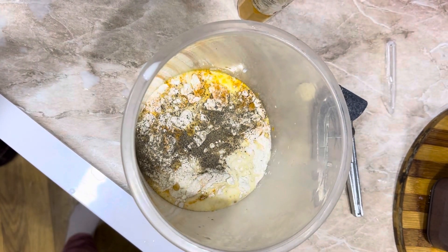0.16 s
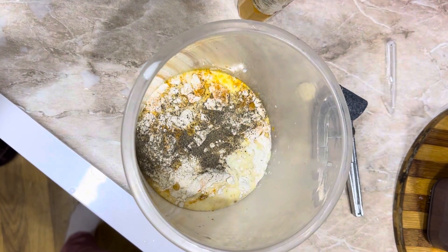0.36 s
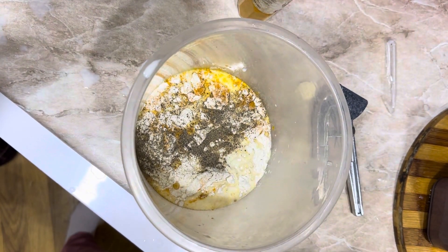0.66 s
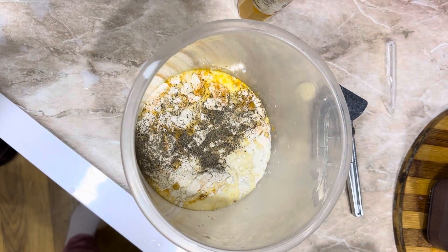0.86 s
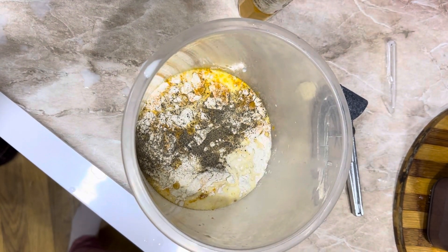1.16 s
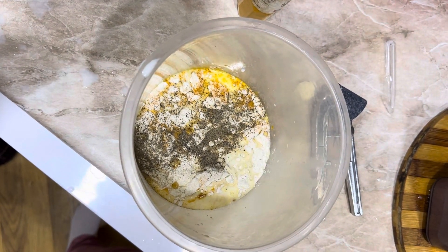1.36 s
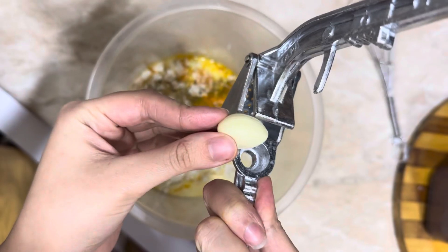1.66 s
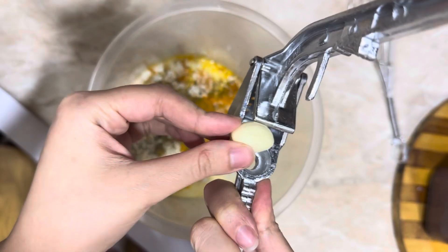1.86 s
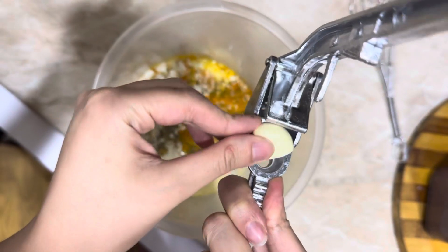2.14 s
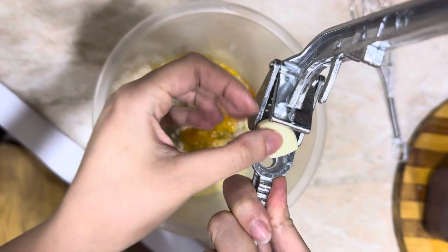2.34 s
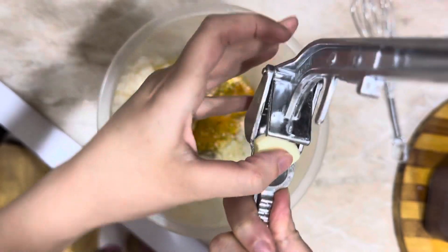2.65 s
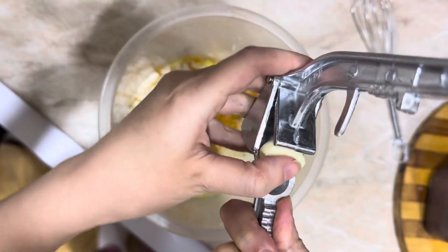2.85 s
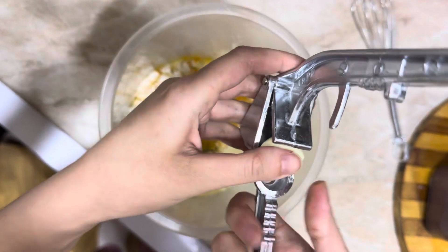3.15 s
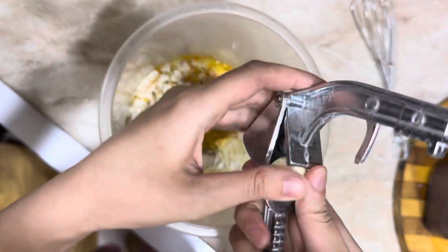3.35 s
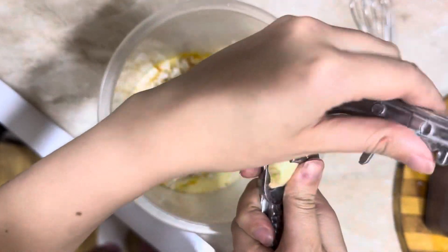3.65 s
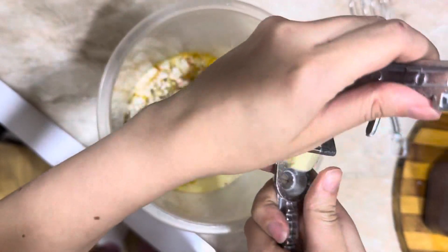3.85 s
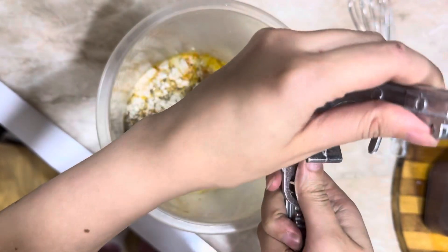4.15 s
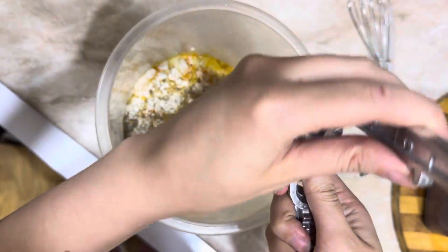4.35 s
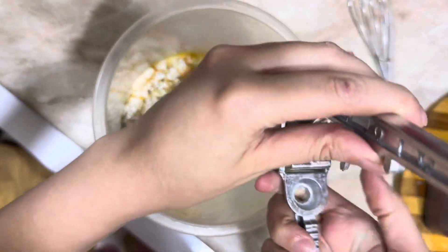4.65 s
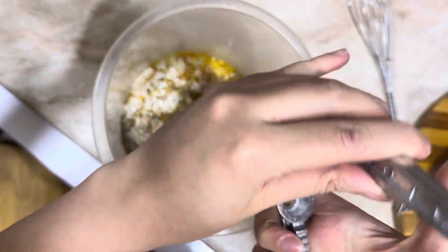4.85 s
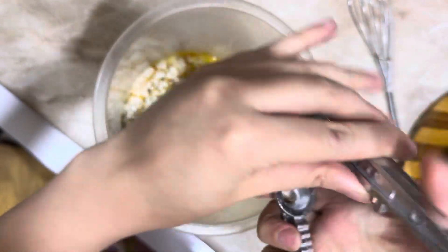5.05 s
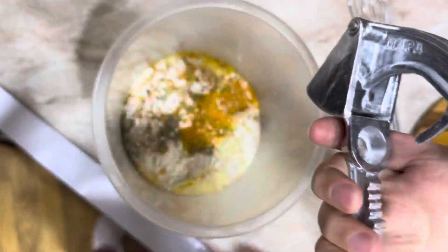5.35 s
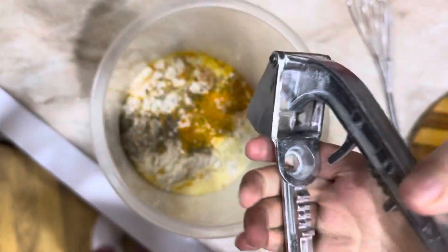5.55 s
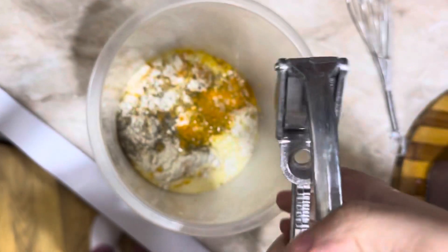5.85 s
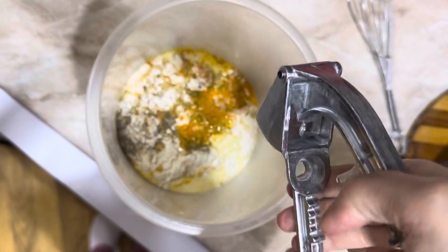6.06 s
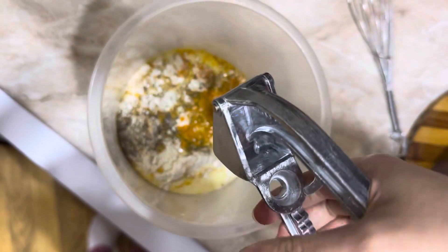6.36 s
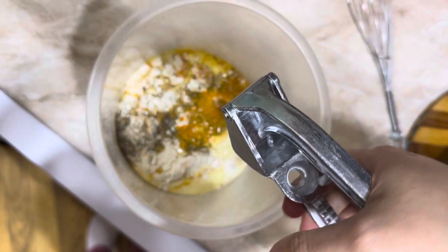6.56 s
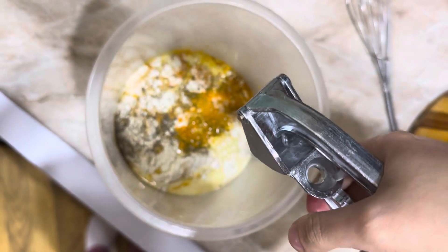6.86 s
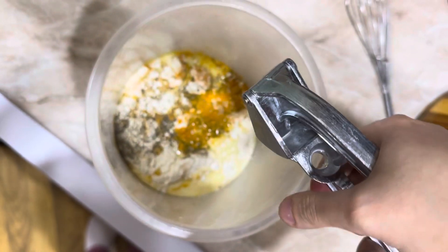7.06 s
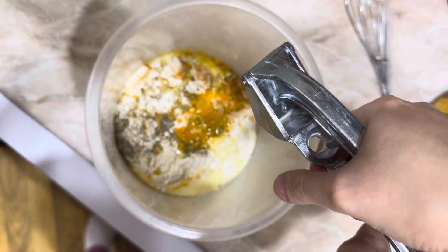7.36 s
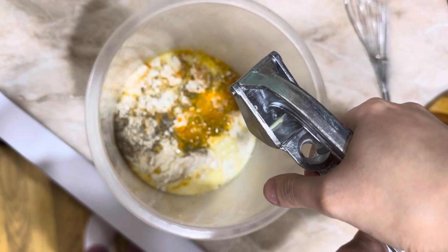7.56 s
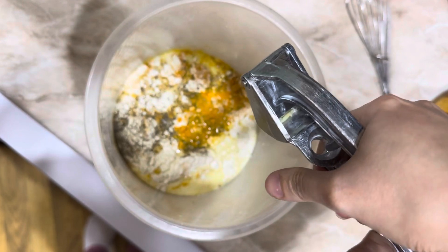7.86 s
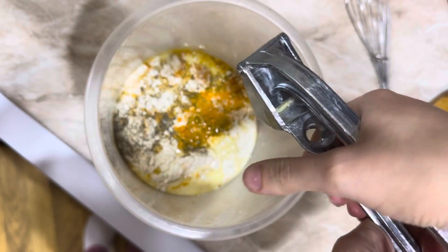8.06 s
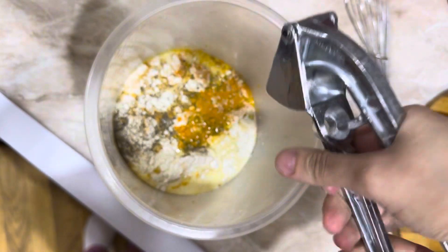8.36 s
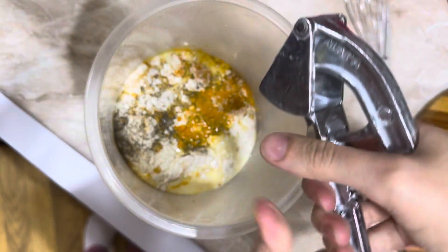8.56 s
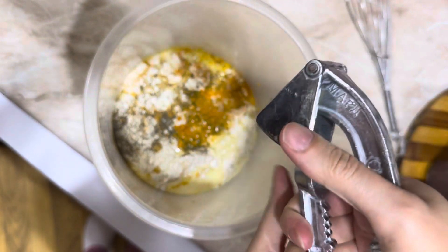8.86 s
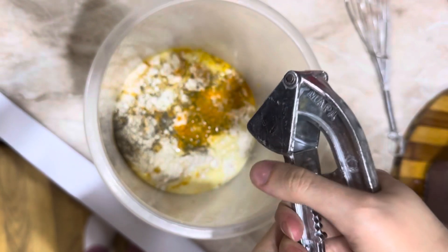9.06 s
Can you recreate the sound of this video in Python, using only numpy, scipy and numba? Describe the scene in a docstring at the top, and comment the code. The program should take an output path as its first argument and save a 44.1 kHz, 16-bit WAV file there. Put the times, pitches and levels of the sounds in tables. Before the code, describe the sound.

A metal garlic press clicks and snaps shut, then a clove cracks and juice hisses and spits in a quiet kitchen.

```python
"""A quiet kitchen, one microphone close to a mixing bowl; an appliance hums throughout.
First, a little way off, things knock and slide on the counter. From 2 s, close by, fingers load a metal
garlic press: its hinge scrapes, its plunger squeaks, and near 4.9 s it snaps shut. At 6.2 s the clove
cracks under the squeeze; juice and air seep and spit through the holes, gush at 7.3 s and leave a
fizzing foam. Last come a faint gurgle and the fingers shifting on the metal."""
import sys
import numpy as np
from scipy import signal
from scipy.fft import rfft, irfft
from scipy.io import wavfile
from scipy.ndimage import uniform_filter1d
from numba import njit

SR = 44100
rng = np.random.default_rng(int(sys.argv[2]) if len(sys.argv) > 2 else 0)


def master_out(mix):
    """Clip the mix to full scale and print it as 16-bit PCM to the path in sys.argv[1]."""
    frames = np.transpose(np.atleast_2d(mix))
    ceiling = np.clip(frames, -1, 1)
    pcm = np.round(ceiling * 32767).astype(np.int16)
    wavfile.write(sys.argv[1], SR, pcm)


N = 406161
TIME = np.arange(N) / SR


def amp(db):
    """Decibels to gain."""
    return 10 ** (np.asarray(db) / 20)


def unit(x):
    """Scales to rms 1."""
    return x / np.sqrt(np.mean(x ** 2) + 1e-20)


def read(points, hz):
    """Reads a table on a log-frequency axis."""
    f, value = np.transpose(points)
    return np.interp(np.log(hz + 1), np.log(f + 1), value)


def add(mix, s, sound):
    """Mixes a sound in at time s."""
    start = round(s * SR)
    sound = sound[max(-start, 0):]
    part = mix[max(start, 0):][:len(sound)]
    part += sound[:len(part)]


def colour(x, spectrum, hz=1000, bump_db=0, tilt_db=0):
    """Causal filter: a spectrum with a bump at hz, tilted by tilt_db per octave for two each side."""
    f = abs(np.fft.fftfreq(len(x), 1 / SR))
    octaves = np.log2((f + 1) / hz)
    db = read(spectrum, f) + bump_db * np.exp(-(octaves / .24) ** 2) + tilt_db * np.clip(octaves, -2, 2)
    minimum_phase = np.exp(np.conj(signal.hilbert(np.log(amp(db)))))
    return np.fft.ifft(np.fft.fft(x) * minimum_phase).real


@njit
def smooth(x, memory):
    """One-pole low-pass whose memory may change."""
    y = x.copy()
    for i in range(1, len(x)):
        y[i] = memory[i] * y[i - 1] + (1 - memory[i]) * x[i]
    return y


def resonate(x, hz, width):
    """A steep resonance whose pitch and width in Hz may glide; noise keeps its level through it."""
    carrier = np.exp(2j * np.pi * np.cumsum(hz * np.ones(N)) / SR)
    memory = np.exp(-np.pi * abs(width) * np.ones(N) / SR)
    band = carrier * smooth(smooth(x / carrier, memory), memory)
    return unit(band.real / np.sqrt(1 - memory))


def drift(rate_hz):
    """A random wander of rms 1, mostly slower than rate_hz."""
    rolloff = np.exp(-np.fft.rfftfreq(N, 1 / SR) / rate_hz)
    return unit(irfft(rfft(rng.standard_normal(N)) * rolloff, N))


def grains(per_s, spread_db):
    """Random clicks of uneven size."""
    size = amp(spread_db * np.minimum(rng.exponential(1, N), 4))
    return unit(size * rng.choice([-1, 1], N) * (rng.random(N) < per_s / SR))


def swells(rows, edge=2):
    """Envelope of strokes (middle t/s, length/s, level/dB); a higher edge makes them more abrupt."""
    return sum(amp(db) * np.exp(-abs(2 * (TIME - s) / length) ** edge) for s, length, db in rows)


def held(start, end, attack_s, fade_db_per_s):
    """Envelope that rises, holds and dies away."""
    return np.clip((TIME - start) / attack_s, 0, 1) * amp(-fade_db_per_s * np.clip(TIME - end, 0, 2))


def ring(modes):
    """A sum of dying sines."""
    t = TIME[:SR // 2]
    return sum(amp(db - 60 * t / t60) * np.sin(2 * np.pi * hz * t) for hz, db, t60 in modes)


def burst(rattle_s):
    """A spray of tiny contacts, dying in a few ms, even in spectrum."""
    t = TIME[:SR // 10]
    spectrum = rfft(rng.standard_normal(len(t)) * np.exp(-t / rattle_s))
    spectrum /= np.sqrt(uniform_filter1d(abs(spectrum) ** 2, size=70) + 1e-12)
    delay = np.exp(-2j * np.pi * np.fft.rfftfreq(len(t), 1 / SR) * .001)
    return irfft(spectrum * delay, len(t))


def blows(rows, spectrum, rattle_s, modes=(), ring_db=0):
    """Each blow is a coloured burst that may set a body ringing; 26 dB harder rattles half as long."""
    out = np.zeros(N)
    mean_db = np.mean(rows, axis=0)[1]
    for s, db, hz, bump_db, tilt_db in rows:
        spray = burst(rattle_s * 2 ** ((mean_db - db) / 26))
        hit = colour(spray, spectrum, hz, bump_db, tilt_db)[:SR // 20]
        peak = 2 * np.sqrt(uniform_filter1d(hit ** 2, size=44).max())
        add(out, s - .0005, amp(db) * hit / peak)
        if len(modes):
            add(out, s + .001 + rng.random() / 1000, amp(db + ring_db) * ring(modes))
    return out


# room tone: f/Hz, gain/dB
AIR_COLOUR = [(15, -58.5), (25, -36), (102, -1), (123, -11), (270, -15.5), (309, -9.5), (373, -23.5),
              (405, -14), (575, -31), (2690, -30), (5430, -31.5), (6050, -37.5), (8590, -46.5),
              (10100, -45.5), (16000, -55.5)]
# the appliance in the background: f/Hz, level/dB
HUM_TONES = [(76, -78), (99, -72.5), (305.5, -75.5), (407, -75.5)]


def kitchen():
    """Still air, a wavering appliance hum and a thin whine that pulses with the mains."""
    air = amp(-67.5) * unit(colour(rng.standard_normal(N), AIR_COLOUR))
    hum = np.zeros(N)
    for hz, db in HUM_TONES:
        tone = np.sin(2 * np.pi * hz * TIME + .5 * drift(2.3))
        hum += amp(db) * unit(tone * (1 + .21 * drift(4.01)))
    mains = (1 + np.cos(2 * np.pi * 60 * TIME)) / 2
    noise = rng.standard_normal(N)
    whine = amp(-78.5) * resonate(noise, 6150, 260) + amp(-93.5) * resonate(noise, 12300, 400)
    return air + hum + mains * whine


# the kitchen's reverberation: f/Hz, t60/s
ROOM_DECAY = [(150, 0.43), (1000, 0.42), (4000, 0.37), (8000, 0.2), (15000, 0.37)]


def in_room(direct, reverb_db):
    """What reaches the microphone: direct sound and reflections, each band dying at its own speed."""
    hz, t, bands = signal.stft(rng.standard_normal(SR), SR, nperseg=256)
    decay = amp(-60 * t / read(ROOM_DECAY, hz)[:, None])
    tail = signal.istft(bands * decay, SR, nperseg=256)[1][:SR]
    onset = 1 - np.exp(-TIME[:SR] / .0037)
    tail *= onset * (1 + 1.8 * np.exp(-TIME[:SR] / .014))  # bowl and counter answer first
    return direct + amp(reverb_db) * signal.fftconvolve(direct, tail / np.linalg.norm(tail))[:N]


# things set down: t/s, level/dB, f/Hz, bump/dB, tilt/(dB per octave)
KNOCK_HITS = [(.3605, -36, 944, 13, 1.5), (.3695, -26, 1016, 12, 3.2), (.377, -34, 1070, 10.5, 2),
              (.4018, -31, 1150, 5, 2.5), (.7752, -30, 1147, 14, 2.4), (.797, -36, 599, 11.5, -1.3),
              (.803, -33, 1100, 8.5, 1.5), (.8255, -29.5, 1127, 13.5, -2), (.8335, -34, 1260, 5, 2),
              (.931, -35, 1790, 14, -1), (.9438, -14.5, 1173, 3.5, .5), (.949, -27, 992, 10, -2.3)]
# things slid along: t/s, length/s, level/dB
SLIDE_STROKES = [(0.0, 0.088, -54.5), (.345, 0.026, -55.5), (.372, 0.02, -46), (1.31, 0.034, -73),
                 (1.385, .11, -56)]
# spectra of a knock and a slide: f/Hz, gain/dB
KNOCK_COLOUR = [(100, -37), (220, -15), (330, -9.5), (600, -8), (1080, -6), (1600, -8), (2300, -13),
                (2800, -23), (3700, -17.5), (5200, -24), (7500, -22.5), (10000, -32.5), (16000, -41)]
SLIDE_COLOUR = [(150, -14), (450, -15), (700, -2), (1100, -8.5), (1600, -2.5), (2250, -5.5), (2900, -16.5),
                (3600, -13), (4500, -21.5), (9000, -31.5), (16000, -43)]
# ring of what is knocked, and of a utensil at the start: f/Hz, gain/dB, t60/s
BOARD_MODES = [(888, -2.5, .05), (951, -15, .045), (1104, -1.5, 0.056), (1227, -5.5, 0.0498),
               (1580, -11, .06), (2200, -12.5, .08), (4120, -22, .15)]
UTENSIL_MODES = [(5340, -4.5, 0.28), (6562, -1.5, 0.19), (6885, -17, 0.28), (10400, -24, 0.49),
                 (11600, -11, 0.15)]


def counter(end_s=1.405):
    """Things slide and knock a little way off the microphone; their sound stops short."""
    direct = blows(KNOCK_HITS, KNOCK_COLOUR, rattle_s=.0038, modes=BOARD_MODES, ring_db=-24)
    direct += swells(SLIDE_STROKES) * unit(colour(grains(6000, 2.4), SLIDE_COLOUR))
    add(direct, 0, amp(-56.5) * ring(UTENSIL_MODES))
    return in_room(direct, reverb_db=-4) * np.clip((end_s - TIME) / .0051, 0, 1)


# the grip shifts: t/s, length/s, level/dB
GRIP_SHIFTS = [(6.75, 0.19, -66.5), (8.33, 0.035, -54.5), (8.38, 0.072, -58.5), (9.19, 0.04, -64.5)]
# fingers on the press: t/s, length/s, level/dB, f/Hz
FINGER_RUBS = [(2.22, .08, -75, 5000), (3.2, .22, -74, 12000), (3.654, 0.18, -74, 9050),
               (4.11, 0.12, -73, 3100), (4.37, 0.029, -59, 3280), (4.551, 0.055, -62.5, 3110),
               (5.25, 0.18, -73.5, 2250), (5.566, 0.13, -68.5, 6000), (5.874, 0.15, -66.5, 5800),
               (8.13, 0.1, -71, 10000), (8.368, 0.12, -72, 6900), (8.653, 0.15, -76, 12940),
               (8.812, 0.085, -68, 6800), (8.861, 0.068, -67, 12500), (9.12, .15, -75, 9000)]
# spectra of the grip and of the metal, rubbed or struck: f/Hz, gain/dB
GRIP_COLOUR = [(100, -13.5), (280, 8.5), (500, -2.5), (900, -15.5), (1700, -5), (2600, -20.5),
               (6000, -24.5)]
METAL_COLOUR = [(80, -52), (200, -34.5), (600, -32.5), (1000, -31.5), (1600, -8), (2200, -12), (3200, -5),
                (4400, -6), (6000, -8.5), (7800, -9.5), (9200, -19.5), (11000, -15), (13000, -21.5),
                (16000, -37)]


def hands():
    """The grip shifts with a dull shuffle; skin rubs the metal, brighter where its pitch is higher."""
    direct = swells(GRIP_SHIFTS) * unit(colour(grains(2500, 2.6), GRIP_COLOUR))
    slips = grains(4000, 1.2)
    for s, length, db, hz in FINGER_RUBS:
        span = abs(TIME - s) < 2 * length
        stroke = np.exp(-(2 * (TIME[span] - s) / length) ** 2)
        rub = colour(slips[span], METAL_COLOUR, hz, bump_db=4.5, tilt_db=2.6 * np.log2(hz / 6000))
        direct[span] += amp(db) * stroke * unit(rub)
    return in_room(direct, reverb_db=-7.5)


# strokes of the hinge, and of the plunger against clove and basket: t/s, length/s, level/dB
HINGE_SCRAPES = [(2.79, .08, -77), (3.2, 0.14, -80), (4.54, .07, -66), (4.57, 0.032, -55.5),
                 (5.135, 0.15, -69.5), (6.01, 0.054, -66.5), (6.054, 0.043, -47.5)]
PLUNGER_SQUEAKS = [(3.135, 0.029, -71), (3.19, 0.044, -69), (3.25, 0.077, -73.5), (3.42, 0.055, -78),
                   (4.12, 0.056, -80), (4.5, 0.037, -70.5)]
# their resonances: f/Hz, width/Hz, gain/dB
HINGE_BANDS = [(1686, 100, -9), (3380, 3400, -5), (4100, 170, -10), (6065, 250, 3), (8160, 500, -5),
               (10080, 390, -2.5), (10900, 450, 0.5)]
PLUNGER_BANDS = [(2463, 71, 1), (4260, 350, 3.5), (4880, 200, -3), (5170, 100, -6), (8640, 300, -7),
                 (10850, 450, -3)]


def friction():
    """Uneven slips excite the hinge and the plunger, over a little bright grit."""
    out = np.zeros(N)
    for strokes, bands in (HINGE_SCRAPES, HINGE_BANDS), (PLUNGER_SQUEAKS, PLUNGER_BANDS):
        slips = grains(4000, 1.8) * amp(3.5 * drift(35))
        body = unit(sum(amp(db) * resonate(slips, hz, width) for hz, width, db in bands))
        grit = unit(colour(slips, FIZZ_COLOUR, hz=3970, tilt_db=5))
        out += swells(strokes, edge=3.2) * (body + amp(-11.5) * grit)
    return out


# ring of the press: f/Hz, gain/dB, t60/s
PRESS_MODES = [(1590, 3.5, .07), (3145, -13, .25), (3356, -7.5, .28), (3700, 1.5, .11), (4260, -10.5, .3),
               (4931, 3, 0.056), (5480, -11.5, .15), (5785, -10.5, .2), (7080, -9, .11), (7960, -1, .065),
               (9340, -13, .08), (10650, -0.5, 0.1)]


def snap(at_s=4.8828, gap_s=.0014):
    """The press shuts in a chatter of six contacts, the second and third hardest, and rings on."""
    contacts = [(at_s + k * gap_s, -10.5 - 3 * abs(k - 1.5), 4150, 6.5, .4) for k in range(6)]
    out = blows(contacts, METAL_COLOUR, rattle_s=.0021)
    add(out, at_s + gap_s, amp(-40) * ring(PRESS_MODES))
    return out


# metal parts meet, and a faint finger tick at 2.19 s: t/s, level/dB, f/Hz, bump/dB, tilt/(dB per octave)
CLACK_HITS = [(2.1926, -58, 6000, 0, -6), (2.7514, -55, 10000, 6, 5), (3.3513, -51, 4440, 4, 1),
              (3.6254, -36, 1790, 20, 2), (3.9237, -44, 6060, 3, 2.5), (4.062, -44, 2990, 19, -4.5),
              (4.4104, -44.5, 3680, 16, -4), (4.8421, -43, 3038, 11, -3.5), (4.8728, -35, 3090, 4, -3.5),
              (4.8986, -22, 3400, 4.5, 1), (5.1301, -35, 3680, 6, 0), (5.5104, -28, 3710, 7, 3),
              (6.0375, -41, 1644, 10, -2), (8.3593, -44, 6670, 12, 3.5)]
# short ring as the plunger seats: f/Hz, gain/dB, t60/s
SEAT_MODES = [(1760, -8, 0.03), (4300, -4, 0.065)]


def press():
    """Close to the microphone, the metal press clacks, scrapes, squeaks and snaps shut."""
    direct = blows(CLACK_HITS, METAL_COLOUR, rattle_s=.0035, modes=PRESS_MODES, ring_db=-34.5)
    direct += snap() + friction()
    add(direct, 3.627, amp(-46) * ring(SEAT_MODES))
    return in_room(direct, reverb_db=-11.5)


def gurgle(middle_s=8.08, length_s=.12, sag_hz_per_s=1610):
    """A soft, rough tone sinks, with a second one about an octave under it."""
    hz = 690 - sag_hz_per_s * np.clip(TIME - middle_s, -length_s, length_s)
    noise = rng.standard_normal(N)
    tones = resonate(noise, hz, 72) + amp(3) * resonate(noise, hz * .5048, 96)
    return swells([(middle_s, length_s, -66.5)]) * tones


# narrow resonances in the hiss: f/Hz, gain/dB
STEADY_TONES = [(4204, -61.5), (5071, -63), (5787, -60), (6433, -63), (7171, -62), (11434, -65),
                (14309, -69.5)]


def with_steady_tones(flow):
    """Faint, narrow resonances of unchanging pitch colour the hiss."""
    response = ring([(hz, db, .12) for hz, db in STEADY_TONES])
    return flow + amp(-21.5) * signal.fftconvolve(flow, response / np.linalg.norm(response))[:N]


# each tightening of the grip makes the juice seep harder: t/s, length/s, gain/dB
GRIP_PUSHES = [(6.14, 0.053, -62.5), (6.7, .13, -63), (6.99, 0.21, -57), (7.19, .06, -58),
               (7.295, 0.093, -46)]
# spectra of fine bubbles (also the grit in friction) and of the holes the juice passes: f/Hz, gain/dB
FIZZ_COLOUR = [(500, -17), (1100, -15), (2000, -4), (3600, -2.5), (5000, -2), (8500, 2), (10000, 0.5),
               (11500, 1), (13500, -5), (16000, -2.5)]
HOLES_COLOUR = [(1000, -3.5), (1900, 0), (2950, -3.5), (3500, 1.5), (4200, 1), (4650, -2.5), (5100, 0.5),
                (7200, 0.5), (7700, -1.5), (9600, -0.5), (11400, 2), (12300, -1.5), (15000, 1)]


def juice(gush_at_s=7.312, drain_s=.211, seep_hz=5540):
    """Juice seeps, gushes with a hiss that sinks and narrows to a whistle, and leaves a fizzing foam."""
    seep = amp(-66.5) * held(6.1, gush_at_s, attack_s=.07, fade_db_per_s=99.5) + swells(GRIP_PUSHES)
    gush = amp(-36.5) * held(gush_at_s, 7.492, attack_s=.016, fade_db_per_s=380.5)
    spray = swells([(7.395, .091, -42.5)])  # the height of the gush
    foam = amp(-51) * held(7.545, 7.78, attack_s=.035, fade_db_per_s=130)

    # the basket drains ever faster, and the resonance of the holes sinks and narrows
    drained = np.clip((TIME - gush_at_s) / drain_s, 0, 1) ** 1.8
    gush_hz = np.interp(drained, [0, 1], [6330, 3610])
    gush_width = np.interp(drained, [0, 1], [2300, 600])

    spurts = drift(110)  # juice comes in tiny spurts
    froth = unit(colour(grains(12000, 3.4), FIZZ_COLOUR, hz=4000, tilt_db=3.3))
    crackle = unit(colour(grains(520, 4.3), FIZZ_COLOUR))  # single bubbles bursting
    bubbles = colour(grains(12000, 1.7), FIZZ_COLOUR)
    overtone = resonate(bubbles, 2.15 * np.where(TIME < gush_at_s, seep_hz, gush_hz), 2400)
    fizz = froth + amp(-4) * crackle + amp(-8.5) * overtone
    fizz *= amp(-3.5) * seep + amp(-11.5) * gush + foam

    hiss = seep * resonate(bubbles, seep_hz, 2200)
    hiss += gush * resonate(bubbles, gush_hz, gush_width) + spray * overtone
    hiss += amp(-10.5) * (seep + gush) * resonate(bubbles, 4320, 1200)  # hollow of the press
    hiss += amp(-19) * gush * resonate(bubbles, 2700, 600)  # wet body of the gush
    hiss += amp(-8) * foam * resonate(bubbles, 3400, 1900)
    flow = amp(1.8 * spurts) * fizz + amp(.92 * spurts) * hiss
    return with_steady_tones(colour(flow, HOLES_COLOUR))


def foam_pops(count=9, start_s=7.58, end_s=7.87, spread_db=10, spread_octaves=.9):
    """Small bubbles of chance size pop one after another, as rows of t/s, level/dB, f/Hz."""
    when, size, pitch = rng.random((count, 3)).T
    s = start_s + (end_s - start_s) * (np.arange(count) + when) / count
    db = -45 + spread_db * (size - .5)
    hz = 2500 * 2 ** (spread_octaves * (pitch - .5))
    return list(zip(s, db, hz))


# the clove splits: t/s, level/dB, f/Hz, bump/dB, tilt/(dB per octave)
CLOVE_CRACKS = [(6.2108, -14.5, 6640, -6, 4.3), (6.2139, -10.5, 1000, 7.5, 3), (6.2667, -13.5, 1940, 9, 1)]
# pockets of juice burst at the holes: t/s, level/dB, f/Hz
JUICE_SPITS = [(6.466, -43.5, 9150), (6.7147, -24.5, 4740), (7.039, -25.5, 6500), (7.1493, -22, 6900),
               (7.226, -14.5, 7600), (7.2533, -25.5, 7150), (7.2675, -29, 6700), (7.2752, -14, 7050),
               (7.284, -16, 4870), (7.309, -32, 2200), (7.4144, -21.5, 5200), (7.534, -31.5, 8700),
               (7.5578, -31.5, 13300), (7.5995, -33, 7500), (7.648, -31.5, 2700), (7.666, -38, 2100),
               (7.696, -42, 1900), (7.7034, -27.5, 3700), (7.714, -29.5, 3200), (7.7185, -34, 1850),
               (7.732, -32.5, 3350), (7.7667, -27.5, 11500), (7.7908, -14, 11300), (7.7985, -34.5, 3500)]
# spectra of a crack and a spit: f/Hz, gain/dB
CRACK_COLOUR = [(100, -35), (250, -14.5), (600, -16.5), (1100, -6), (2200, -8.5), (3000, -13.5),
                (3900, 1.5), (5200, -5.5), (6900, -5), (8800, -18.5), (10800, -16), (13000, -32),
                (16000, -36)]
SPIT_COLOUR = [(80, -48.5), (300, -16), (900, -18), (1800, -1), (3500, 4.5), (5500, 6), (7300, 4),
               (9500, -2.5), (11400, 4.5), (13500, -13), (16000, -11.5)]


def garlic(bubble_bump_db=8.5):
    """Close up, over the bowl, the clove cracks and juice hisses and spits, higher pockets brighter."""
    pockets = JUICE_SPITS + foam_pops()
    spits = [(s, db, hz, bubble_bump_db, 3.6 * np.log2(hz / 3300)) for s, db, hz in pockets]
    direct = juice() + blows(CLOVE_CRACKS, CRACK_COLOUR, rattle_s=.0016)
    direct += blows(spits, SPIT_COLOUR, rattle_s=.0022)
    return in_room(direct, reverb_db=-12.5)


def scene():
    """All sources at the one microphone by the bowl."""
    return (counter() + press() + hands() + garlic() + gurgle() + kitchen())[None]


def record(dry):
    """The recorder's band ends at 16 kHz."""
    lowpass = signal.firwin(301, 16000, window=("kaiser", 9), fs=SR)
    return signal.oaconvolve(dry, lowpass[None], "same")


dry = scene()
out = record(dry)
master_out(out)
```